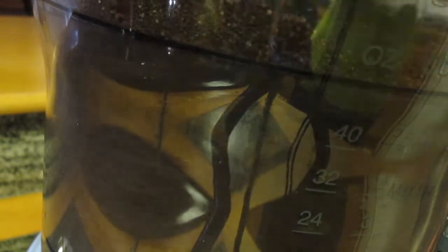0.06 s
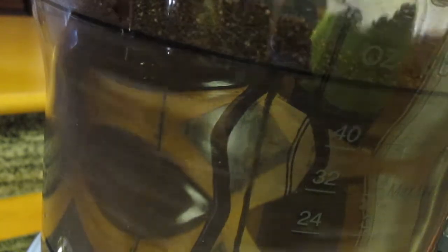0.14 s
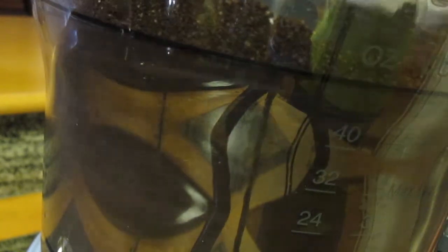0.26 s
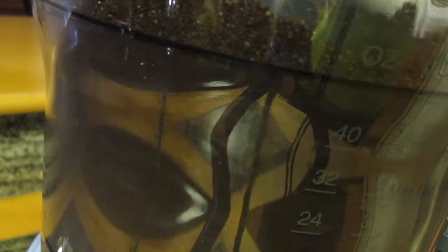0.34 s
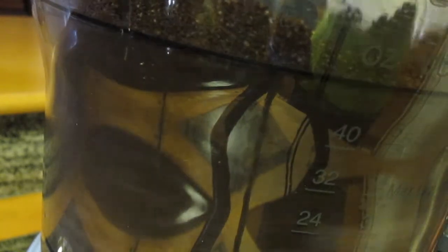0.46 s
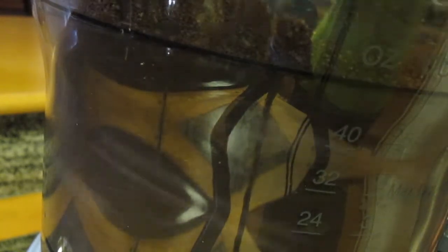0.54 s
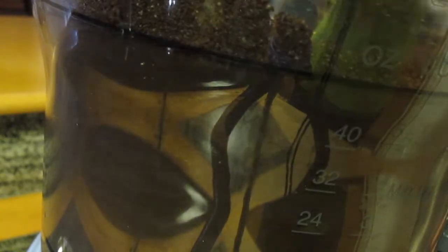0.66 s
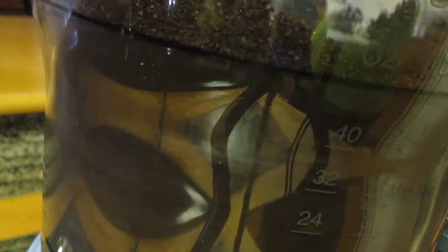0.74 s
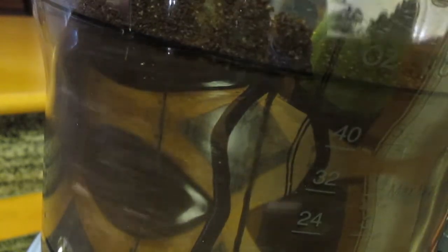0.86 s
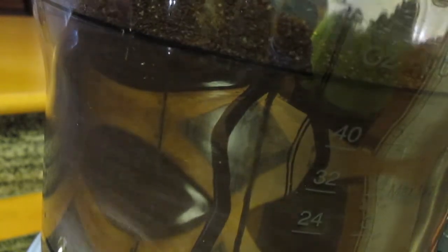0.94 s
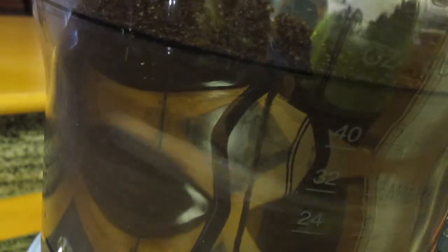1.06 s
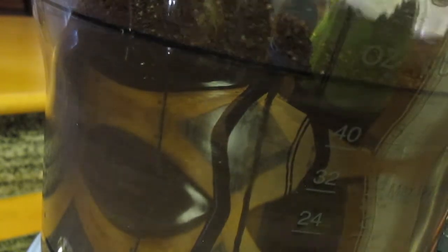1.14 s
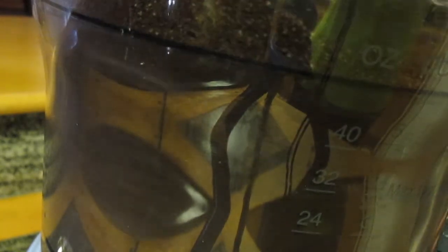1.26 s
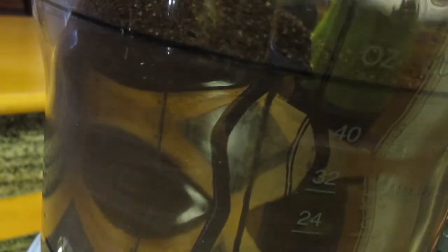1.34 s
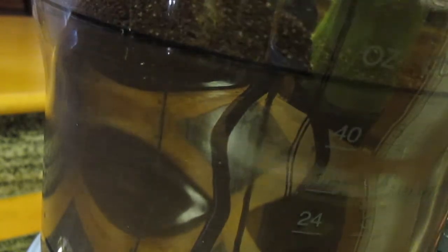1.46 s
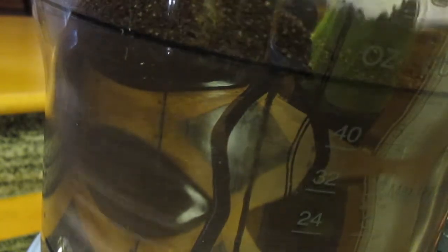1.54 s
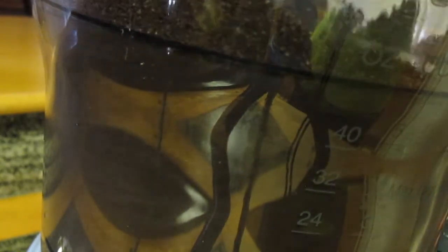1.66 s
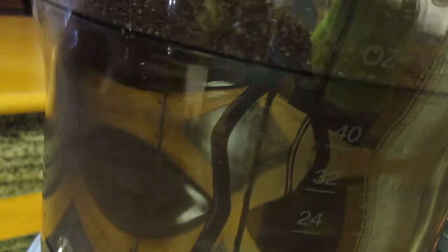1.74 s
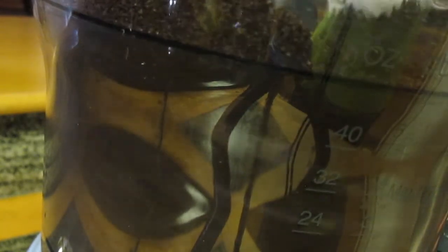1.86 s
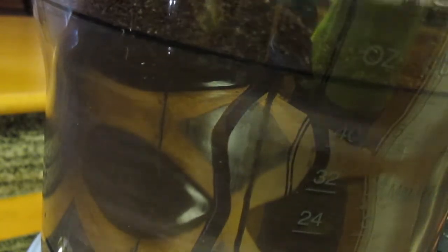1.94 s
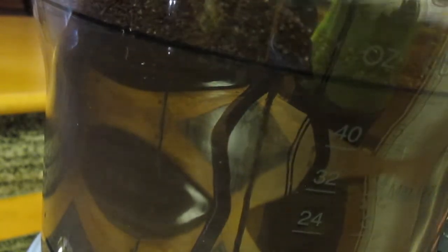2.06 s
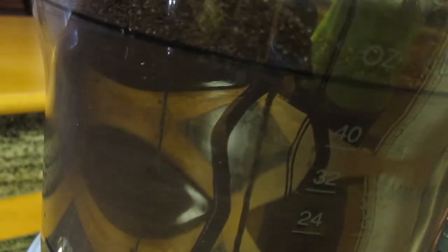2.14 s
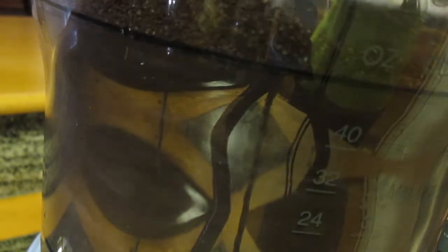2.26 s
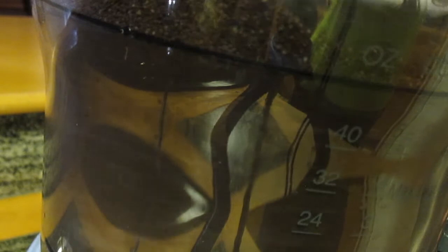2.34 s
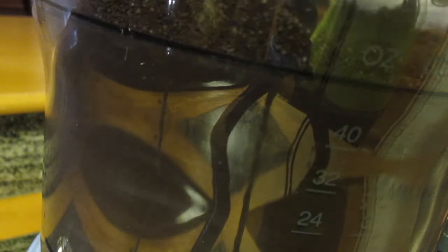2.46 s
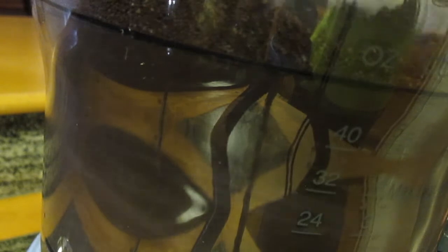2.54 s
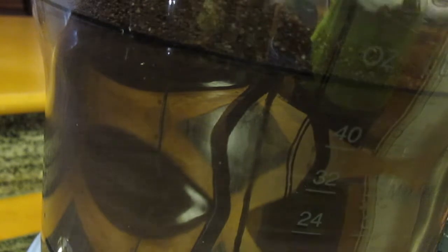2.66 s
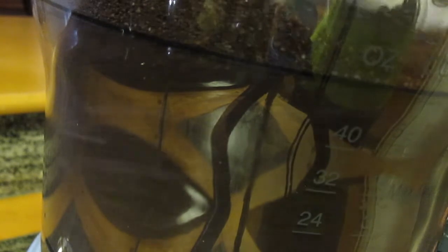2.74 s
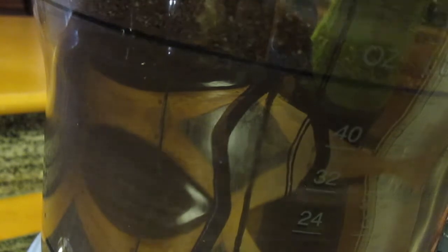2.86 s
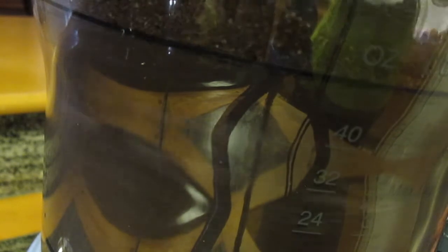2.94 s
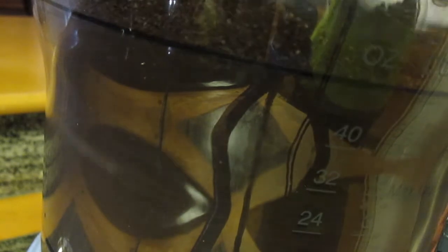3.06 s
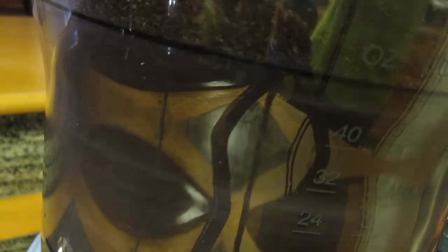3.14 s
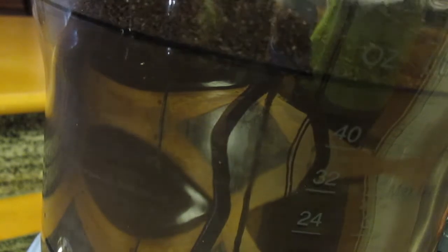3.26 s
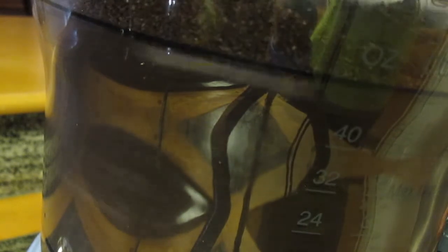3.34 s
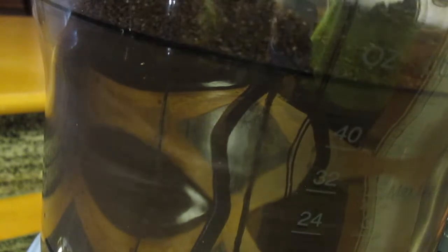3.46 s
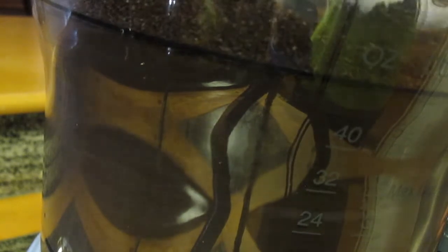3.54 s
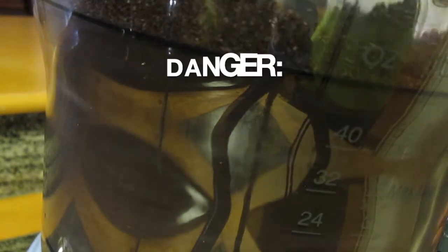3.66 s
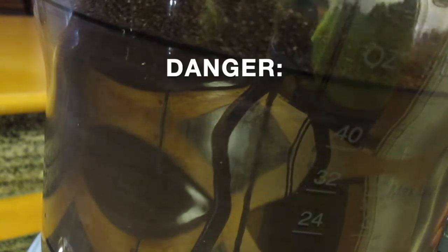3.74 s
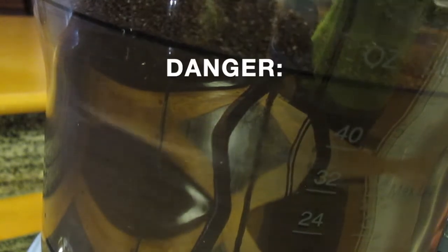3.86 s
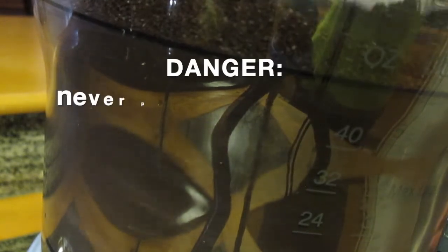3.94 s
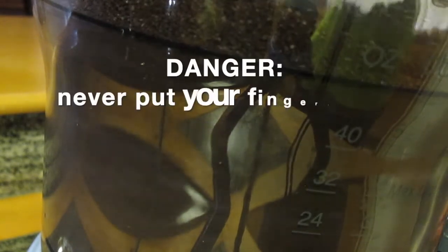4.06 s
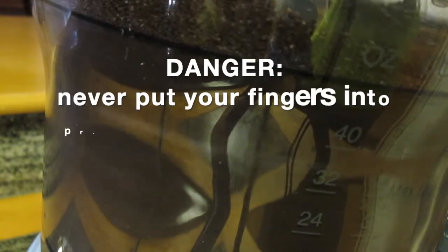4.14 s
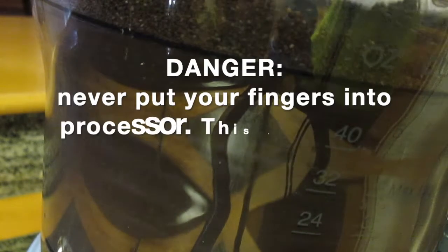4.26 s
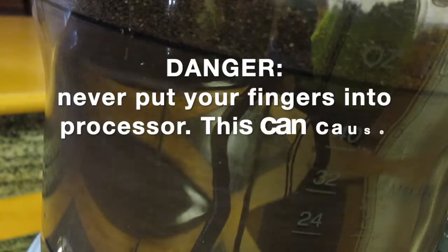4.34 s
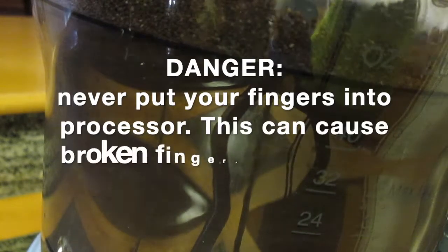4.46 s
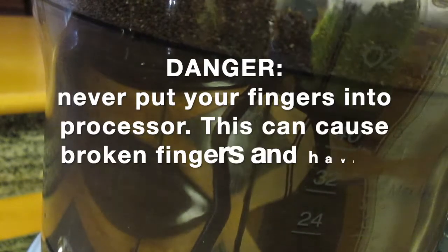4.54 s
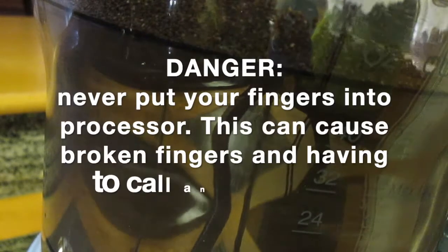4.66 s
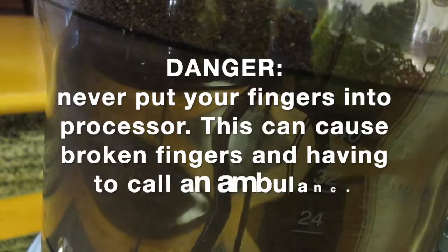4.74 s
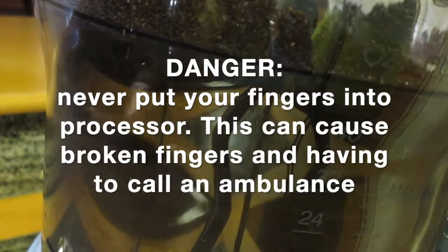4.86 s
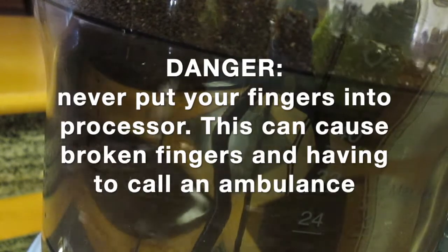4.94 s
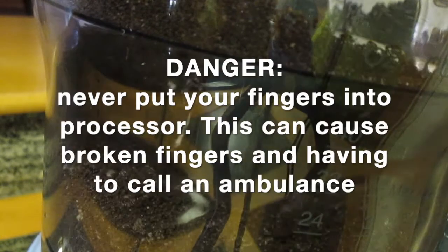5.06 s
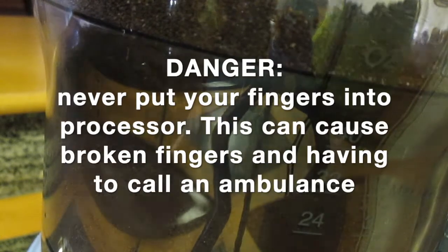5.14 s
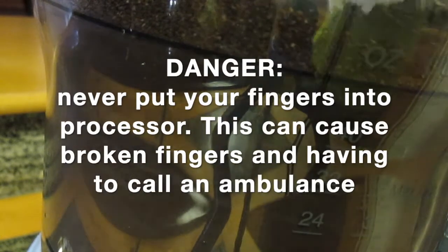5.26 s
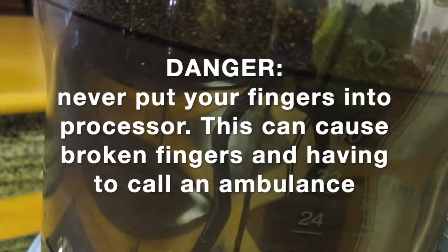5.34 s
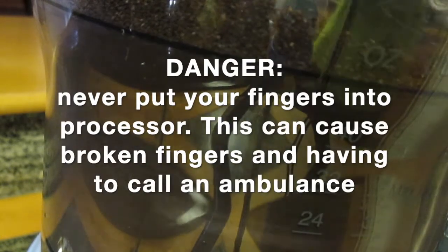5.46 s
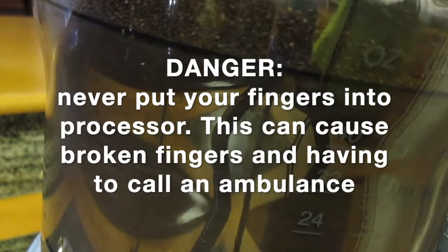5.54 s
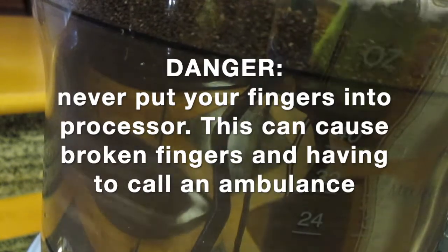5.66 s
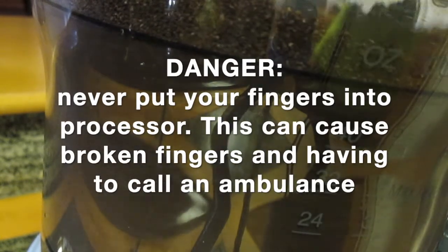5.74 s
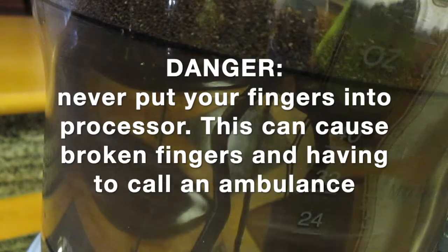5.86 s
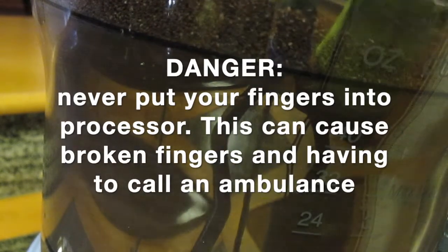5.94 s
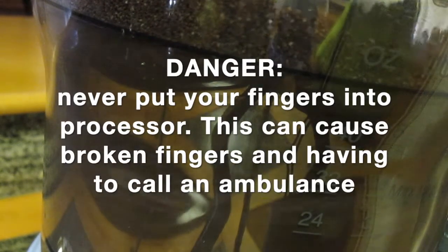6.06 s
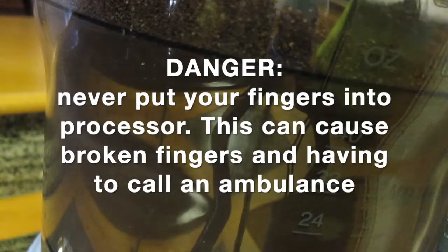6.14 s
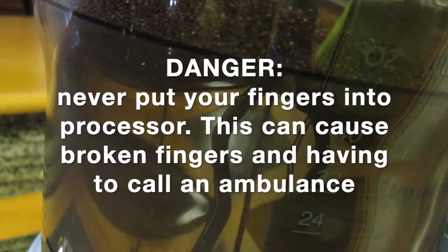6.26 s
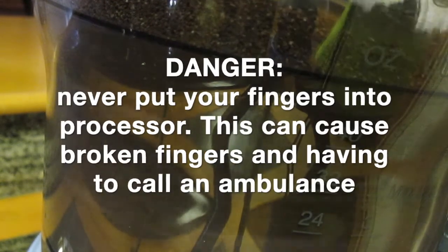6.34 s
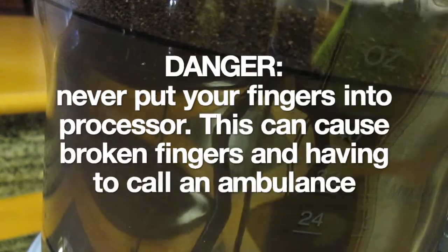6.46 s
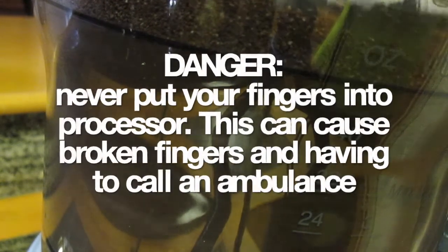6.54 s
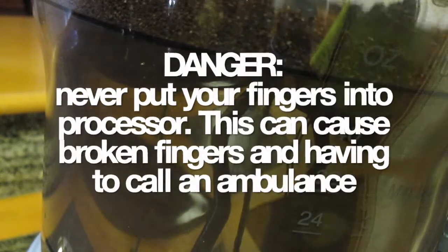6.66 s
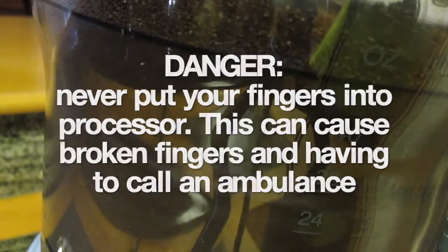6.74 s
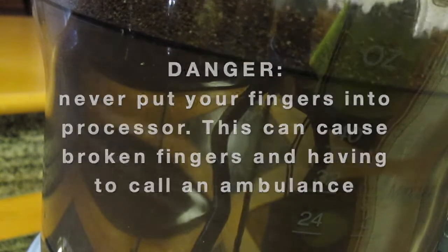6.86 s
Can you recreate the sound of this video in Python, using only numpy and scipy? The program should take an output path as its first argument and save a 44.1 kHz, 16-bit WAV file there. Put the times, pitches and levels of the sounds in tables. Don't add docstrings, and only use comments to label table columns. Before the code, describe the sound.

A food processor chops hard cookies in a plastic bowl, very close to a small microphone in a lightly echoing kitchen. At 0 s a burst is already starting: coarse rattle, gritty crackle, low counter shake and heavy knocks. It coasts down by 0.7 s, gear whine sliding lower, a few crumbs ticking. A short, weaker burst comes at 0.9 s, with another whining spin-down. A fuller chop starts at 1.85 s, with a run of brittle cracks around 2.2-2.4 s. A longer one begins at 2.75 s, full of thuds, leading almost unbroken into the longest, loudest burst at 3.7 s, snapping sharply near 4.06 s. It slows from about 4.4 s, nearly stopping by 4.9 s over faint wavering hum. A strong jolt and chop hit at 5.1 s, easing away; a last short burst at 6.1 s cracks sharply, then runs down with scattered knocks to the end.

```python
import sys
import numpy as np
from scipy import signal
from scipy.fft import rfft, irfft
from scipy.io import wavfile
from scipy.ndimage import uniform_filter1d

SR = 44100
rng = np.random.default_rng(int(sys.argv[2]) if len(sys.argv) > 2 else 0)


def dump(signal):
    limited = np.clip(np.atleast_2d(signal).T, -1, 1)
    pcm = np.round(limited * 32767).astype(np.int16)
    wavfile.write(sys.argv[1], SR, pcm)


def magnitude_from_level(level_db):
    exponent = np.asarray(level_db, float) / 20
    return 10 ** exponent


N = 304290

# (time [s], hard chopping lasts [s], bowl rattle [dB], easing after it [dB],
# share of the coasting fade [factor])
PRESSES = [
    (-.05, 0.23, -15, -5.5, 0.84),
    (0.921, 0.33, -16, -3.5, 0.76),
    (1.848, 0.29, -16, -2.5, 0.58),
    (2.766, 0.37, -16, -2.5, 1.04),
    (3.707, .45, -16.5, -1, 0.79),
    (5.128, 0.3, -14, -4.5, 1.06),
    (6.116, 0.12, -15, -1.5, 1),
]
# (time at which teeth mesh 400 a second [s], stretch of the spin-down [factor])
COASTS = [(.72, 1), (1.72, 1.05), (2.72, 1.5), (3.84, 1.1), (4.775, 1.15), (6.27, 1), (8, 1)]
# (time from that moment [s], tooth rate [Hz])
SPIN_DOWN = [(-.45, 2000), (-.3, 1650), (-.24, 1400), (-.14, 885), (-.05, 510), (0, 400), (.07, 270)]
# (time from that moment [s], tooth rate [Hz])
LAST_TURNS = [(.12, 150), (.19, 59.2), (.3, 40)]
WHINE_COAST_DB = [0, 3, -2, -10, 0, -10, 0]
# (multiple of the tooth rate, level [dB])
WHINE_OVERTONES = [(1, -4), (2, 0), (3, 2.5), (4, -3)]
# (time [s], load [dB], shaking of the base [dB], treble [dB])
LOAD = [(0, 0, -2, 1), (.2, -1.5, 3.5, 0.5), (.5, 0.5, -0.5, -0.5), (.8, -3, -2, 2.5), (1.15, 1.5, 4, 0.5),
        (2.05, -0.5, -2.5, 0), (2.5, 3, 1.5, 0.5), (2.72, -0.5, -1, -1), (2.92, 1, 0, 0),
        (4.24, 0, -1.5, 1), (4.35, 0.5, 1.5, -1.5), (4.75, 0.5, -2, -0.5), (4.95, -7.5, 3, 5),
        (5.15, 2, -0.5, 0), (5.3, -2, 2, 0), (5.57, 0.5, -2.5, -2), (6.65, 0.5, 1, 1), (6.9, -2, -2, 0)]
# (time [s], peak [dB], thud above peak [dB])
CHUNKS = [(.0633, -4.5, 10), (.152, -5.5, 6), (1.0792, -4.5, 8.5), (1.1172, -5.5, 2), (1.2623, -6.5, 7.5),
          (1.3234, -5.5, 7), (1.9455, -9.5, 15), (2.1435, -5, 7), (2.5685, -10.5, 4), (2.7611, -20, 8),
          (2.8743, -16, 15), (2.8924, -6.5, 6), (3.019, -4, 7.5), (3.1572, -4, 1), (3.2435, -4, 6),
          (3.2794, -11, 7), (3.734, -5.5, -1), (4.1475, -7, -4), (4.3849, -8.5, 10.5), (5.1592, -2.5, 4),
          (5.2118, -2.5, 2), (5.3477, -6, 10), (5.4031, -6.5, 10.5), (5.4819, -6.5, 3), (5.797, -4.5, 8.5),
          (6.0475, -8.5, 4), (6.343, -7.5, 7), (6.5839, -5.5, -2), (6.6707, -7.5, 7), (6.795, -8.5, 6)]
# (time [s], peak [dB])
BRITTLE_PIECES = [(.0388, -12), (.2154, -13), (.938, -14), (1.1672, -5), (1.415, -12), (2.1814, -7),
                  (2.23, -7.5), (2.2756, -9), (2.3396, -8), (2.3934, -9.5), (2.792, -7), (2.9914, -6),
                  (3.0728, -5), (3.1103, -5), (3.3586, -15), (3.4207, -10), (3.8417, -11), (3.8955, -6),
                  (3.9296, -6.5), (3.9846, -4.5), (4.061, -1.5), (4.1063, -7), (4.1934, -12), (4.303, -5),
                  (5.567, -10), (5.7443, -9.5), (6.1479, -14), (6.257, -2), (6.294, -6), (6.845, -5)]
# (time [s], peak [dB])
LIGHT_PIECES = [(.2614, -15), (.3324, -24), (0.3957, -12), (.4524, -16), (.6464, -35), (.7068, -28),
                (.7931, -40), (0.91, -35), (1.01, -14), (1.5494, -20), (1.82, -35), (2.4672, -10),
                (2.498, -14), (2.6329, -23), (4.4887, -13), (4.5644, -15), (4.6189, -27), (4.667, -21.5),
                (4.8094, -35), (4.937, -31), (4.954, -32), (5.027, -40), (5.0564, -46), (5.6386, -10.5),
                (5.8854, -20), (5.934, -27), (6.1996, -24), (6.4617, -10), (6.6169, -15), (6.7194, -11)]
# (frequency [Hz], level [dB per Hz])
BOWL_TONE = [(18, -89), (30, -38), (92, -14), (219, -12), (379, -17.5), (480, -9.5), (749, -2.5),
             (923, 3.5), (1110, -9), (1260, -2), (1730, -7.5), (2130, -9), (7680, -16.5), (10200, -16.5),
             (15600, -30.5)]
# (frequency [Hz], width [Hz], lift [dB])
BOWL_MODES = [(93, 100, 7), (236.4, 96, 9), (485.7, 49, 7.5), (579, 44, 5), (676, 45, 3), (863, 12, 0),
              (904, 7.4, 2.5), (1070, 90, 3), (1264, 123, 4), (1403, 88, 4), (1608, 27, 9), (1860, 55, -1),
              (2156, 117, 8.5), (2388, 65, 6), (2605, 23, 12), (2600, 45, -3.5), (3052, 83, 0),
              (3204, 17, 6.5), (3610, 18, 6.5), (3894, 180, 3.5), (4530, 320, 1), (5860, 520, 2.5),
              (6400, 330, 0), (8200, 960, 3.5)]
# (frequency [Hz], level [dB per Hz])
KITCHEN_TONE = [(18, -40), (30, 1), (92, -11), (160, -4), (208, -8), (250, -13), (468, -9.5), (657, -27),
                (810, -8), (1300, -25), (2840, -46), (5190, -31), (6560, -33), (15600, -64)]

BLADE_HZ = 22.28
RISE_S, TREBLE_RISE_S, EASE_S = 0.009, 0.025, 0.036
FADE_BEND = 1.084
RATTLE_DB_PER_DECADE, CRACKLE_DB_PER_DECADE, GRIT_DB_PER_DECADE, RUMBLE_DB_PER_DECADE = 26, 28.5, 27.5, 24
CRACKLE_DB, GRIT_DB, RUMBLE_DB = -8, -14, -11.5
HARD_TREBLE_DB = 1
HEAP_DB, CRACKLE_FLICKER_DB = 1.3, 0.8
JOLT_DB, JOLT_S = 6.5, 0.053
RING_HZ, RING_SPREAD = 3834, 0.06
BRITTLE_THUD_DB, LIGHT_THUD_DB = -7.5, -14
CHUNK_GRIT_DB, BRITTLE_GRIT_DB, LIGHT_GRIT_DB, GRIT_SPREAD_DB = -15, -16, -11, 2.5
WHINE_DB, WHINE_DB_PER_DECADE, WHINE_BELOW_HZ = -23, 34, 1600
KITCHEN_DB, HUM_HZ, HUM_DB = -48, 63.5, -53
NOTCH_HZ, NOTCH_WIDTH_HZ = 7850, 230


def level(x, db):
    return x * magnitude_from_level(db) / np.sqrt(np.mean(x ** 2))


def band(x, lo_hz, hi_hz):
    return signal.sosfilt(signal.butter(3, [lo_hz, hi_hz], "band", fs=SR, output="sos"), x)


def colour(x, points, modes=()):
    size = 2 ** 14
    hz = np.maximum(np.fft.rfftfreq(size, 1 / SR), 1)
    point_hz, point_db = np.transpose(points)
    db = np.interp(np.log(hz), np.log(point_hz), point_db)
    for mode_hz, width_hz, lift_db in modes:
        db = db + lift_db / (1 + (2 * (hz - mode_hz) / width_hz) ** 2)
    cepstrum = irfft(np.log(magnitude_from_level(db)))
    cepstrum[1:size // 2] *= 2
    cepstrum[size // 2 + 1:] = 0
    response = irfft(np.exp(rfft(cepstrum)))
    return signal.fftconvolve(x, response)[:N]


def through_bowl(x):
    return colour(x, BOWL_TONE, BOWL_MODES)


def walk(rate):
    hold = int(SR / rate)
    steps = np.repeat(rng.standard_normal(N // 100), hold)[:N]
    return 1.3 * uniform_filter1d(uniform_filter1d(steps, hold), hold)


def turning(hz):
    return 2 * np.pi * np.cumsum(hz) / SR


def drive(t):
    press, hard_s, rattle_db, ease_db, share = np.transpose(PRESSES)
    k = np.searchsorted(press, t) - 1
    meshing_s, stretch = np.transpose(COASTS)[:, k]
    since = t - press[k]
    tooth_hz = np.interp((t - meshing_s) / stretch, *np.transpose(SPIN_DOWN + LAST_TURNS))
    hard = 1 / (1 + np.exp(np.clip((since - hard_s[k]) / EASE_S, -50, 50)))
    load_db = rattle_db[k] + ease_db[k] * (1 - hard)
    decades_slower = np.log10(SPIN_DOWN[0][1] / tooth_hz)
    fade = -share[k] * decades_slower ** FADE_BEND
    return since, tooth_hz, load_db, fade, hard, np.take(WHINE_COAST_DB, k)


def swell(db, since, rise_s):
    gain = magnitude_from_level(db)
    start = np.arange(N) - (since * SR).astype(int) - 2
    before = np.where(start > 0, gain[np.maximum(start, 0)], gain)
    return gain + (before - gain) * np.exp(-since / rise_s)


def hail(rate, spread_db, smear_s, hiss_db):
    size = rng.exponential(size=N)
    hits = (rng.random(N) < rate / SR) * magnitude_from_level(spread_db * np.minimum(size, 4.2))
    slew = [1, -np.exp(-1 / (smear_s * SR))]
    scrape = signal.lfilter([1], slew, signal.lfilter([1], slew, hits))
    grains = level(scrape * rng.standard_normal(N), 0)
    return level(grains + magnitude_from_level(hiss_db) * rng.standard_normal(N), 0)


def bowl_rattle(t, heaps):
    rattle = band(through_bowl(hail(900, 1.9, 0.00068, 2.54)), 333, 3500)
    rattle = np.interp(t + 0.00025 * walk(14), t, rattle)
    low = band(rattle, 280, 1040) * magnitude_from_level(1.2 * walk(11))
    high = band(rattle, 987, 3620) * magnitude_from_level(0.97 * walk(12))
    return level((low + high) * magnitude_from_level(0.34 * heaps), -0.64)


def crackle_and_grit(heaps):
    crumbs = through_bowl(hail(1200, 2.3, 0.00078, -0.38)) * magnitude_from_level(heaps)
    crackle = band(crumbs, 2900, 6860) * magnitude_from_level(CRACKLE_FLICKER_DB * walk(30))
    grit = band(crumbs, 6100, 14900) * magnitude_from_level(0.61 * walk(30))
    return level(crackle, CRACKLE_DB - 1), level(grit, GRIT_DB)


def base_rumble(heaps):
    rumble = band(through_bowl(hail(300, 1.6, 0.004, 3.2)), 32, 395)
    return level(rumble * magnitude_from_level(0.87 * heaps), RUMBLE_DB)


def chopping(t, since, load_db, fade, hard):
    s, more_db, shake_db, treble_db = np.transpose(LOAD)
    load_db = load_db + np.interp(t, s, more_db)
    bright_db = load_db + HARD_TREBLE_DB * hard + np.interp(t, s, treble_db)
    jolt_db = JOLT_DB * np.exp(-since / JOLT_S) + np.interp(t, s, shake_db)
    blade_pass = np.sin(turning(BLADE_HZ * (1 + 0.11 * walk(3))))
    heaps = HEAP_DB * walk(24) + walk(55) + 0.75 * blade_pass
    rattle, rumble = bowl_rattle(t, heaps), base_rumble(heaps)
    crackle, grit = crackle_and_grit(heaps)
    rattle = rattle * swell(load_db + RATTLE_DB_PER_DECADE * fade, since, RISE_S)
    crackle = crackle * swell(bright_db + CRACKLE_DB_PER_DECADE * fade, since, TREBLE_RISE_S)
    grit = grit * swell(bright_db + GRIT_DB_PER_DECADE * fade, since, TREBLE_RISE_S)
    rumble = rumble * swell(load_db + jolt_db + RUMBLE_DB_PER_DECADE * fade, since, RISE_S)
    return rattle + crackle + grit + rumble


def burst(t, rise_s, decay_s):
    return (1 - np.exp(-t / rise_s)) ** 2 * np.exp(-t / decay_s)


def knocks():
    crack, grit, ring, thud = np.zeros((4, N + 4000))
    t = np.arange(3500) / SR
    pieces = [(*row, CHUNK_GRIT_DB) for row in CHUNKS]
    pieces += [(*row, BRITTLE_THUD_DB, BRITTLE_GRIT_DB) for row in BRITTLE_PIECES]
    pieces += [(*row, LIGHT_THUD_DB, LIGHT_GRIT_DB) for row in LIGHT_PIECES]
    for s, db, thud_db, grit_db in pieces:
        snap_noise, thud_noise = rng.standard_normal((2, len(t)))
        hz = RING_HZ * (1 + RING_SPREAD * snap_noise[0])
        grit_db = grit_db + GRIT_SPREAD_DB * thud_noise[0]
        start = int((s - 0.003) * SR)
        at = slice(start, start + len(t))
        snap = burst(t, 0.0038, 0.0048) * snap_noise
        crack[at] += magnitude_from_level(db) * snap
        grit[at] += magnitude_from_level(db + grit_db) * snap
        ring[at] += magnitude_from_level(db - 6) * burst(t, 0.002, 0.0046) * np.sin(2 * np.pi * hz * t)
        thud[at] += magnitude_from_level(db + thud_db) * burst(t, 0.0054, 0.012) * thud_noise
    crack = band(through_bowl(crack[:N]), 2900, 6500)
    grit = band(through_bowl(grit[:N]), 6500, 17000)
    thud = band(through_bowl(thud[:N]), 300, 2900)
    return crack * magnitude_from_level(17.5) + grit * magnitude_from_level(27) + thud * magnitude_from_level(3.5) + ring[:N]


def gear_whine(tooth_hz):
    phase = turning(tooth_hz * (1 + 0.02 * walk(90)))
    tones = 0
    for multiple, db in WHINE_OVERTONES:
        tones = tones + magnitude_from_level(db + 4.5 * walk(35) - 4) * np.sin(multiple * phase)
    fade = np.clip((WHINE_BELOW_HZ - tooth_hz) / 200, 0, 1) * np.clip((tooth_hz - 260) / 90, 0, 1)
    gain = fade * magnitude_from_level(WHINE_DB + WHINE_DB_PER_DECADE * np.log10(tooth_hz / WHINE_BELOW_HZ))
    dull = band(band(gain * tones, 350, 2900), 350, 2900)
    return through_bowl(dull) * magnitude_from_level(3)


def kitchen():
    noise = colour(rng.standard_normal(N), KITCHEN_TONE)
    hum = np.sin(turning(HUM_HZ * (1 + 0.025 * walk(2)))) * magnitude_from_level(1.5 * walk(4))
    return level(noise, KITCHEN_DB) + level(hum, HUM_DB)


def room(x, t60_s, wet_db):
    t = np.arange(SR // 2) / SR
    tail = rng.standard_normal(len(t)) * np.exp(-np.log(1000) * t / t60_s) * (t > 0.004)
    tail = tail / np.sqrt(np.sum(tail ** 2))
    return x + magnitude_from_level(wet_db) * signal.fftconvolve(x, tail)[:N]


def scene():
    t = np.arange(N) / SR
    since, tooth_hz, load_db, fade, hard, whine_db = drive(t)
    processor = chopping(t, since, load_db, fade, hard) + knocks()
    processor = processor + gear_whine(tooth_hz) * magnitude_from_level(whine_db)
    return (room(processor, t60_s=0.25, wet_db=-20) + kitchen())[None]


def roll_off(x):
    return signal.sosfilt(signal.butter(12, 15710, fs=SR, output="sos"), x)


def record(dry):
    b, a = signal.iirnotch(NOTCH_HZ, NOTCH_HZ / NOTCH_WIDTH_HZ, SR)
    notched = signal.lfilter(b, a, dry)
    rounded = np.tanh(0.4 * notched) / 0.4
    top_cut = signal.ellip(10, 0.2, 70, 15700, fs=SR, output="sos")
    mix = signal.sosfilt(top_cut, rounded)
    return roll_off(mix)


dry = scene()
out = record(dry)
dump(out)
```